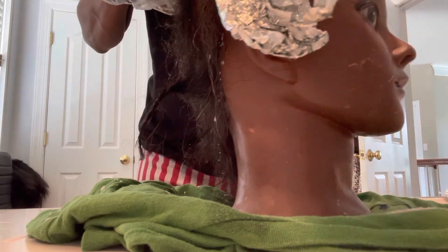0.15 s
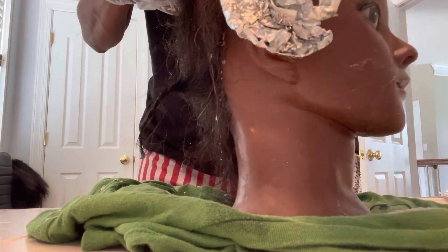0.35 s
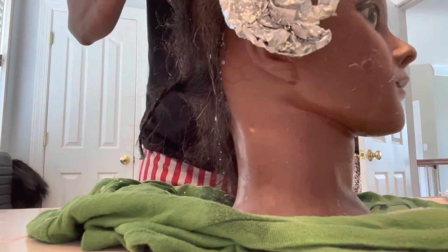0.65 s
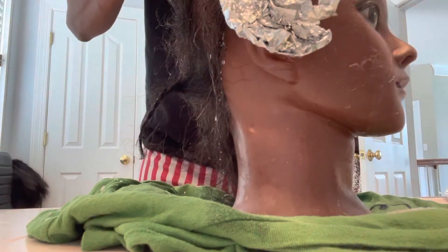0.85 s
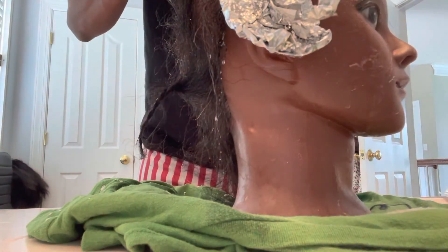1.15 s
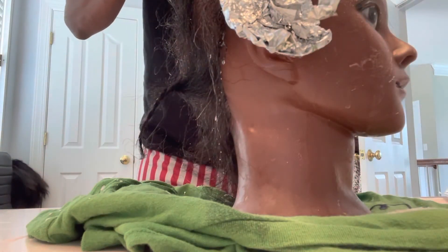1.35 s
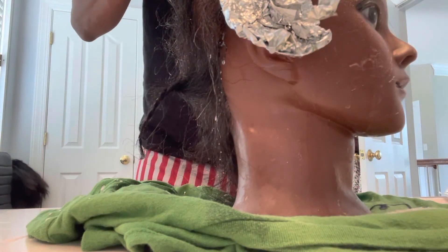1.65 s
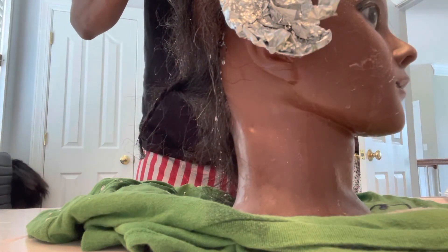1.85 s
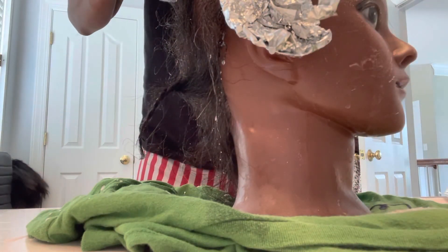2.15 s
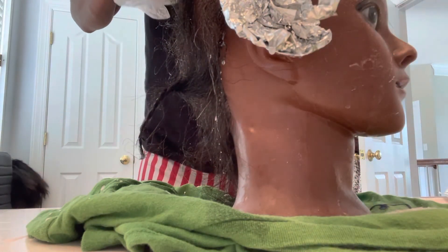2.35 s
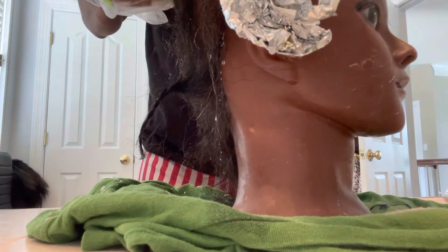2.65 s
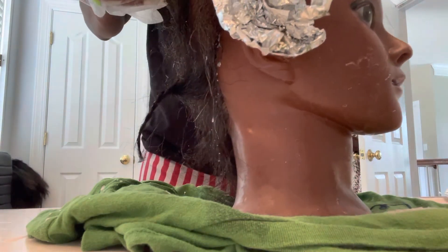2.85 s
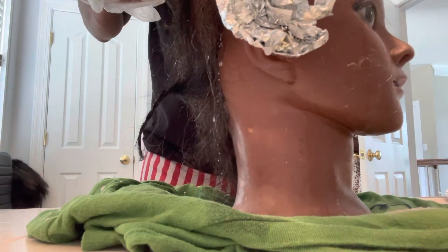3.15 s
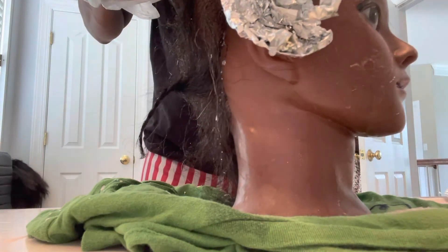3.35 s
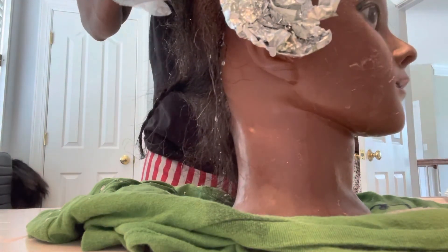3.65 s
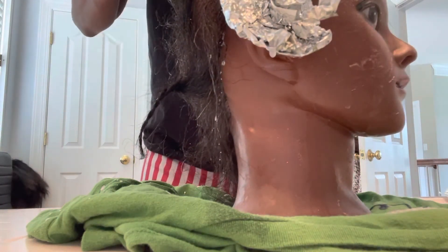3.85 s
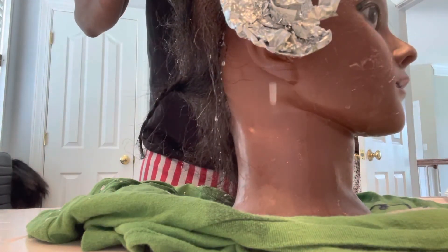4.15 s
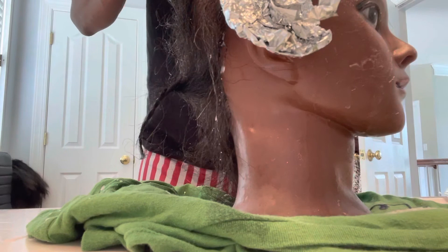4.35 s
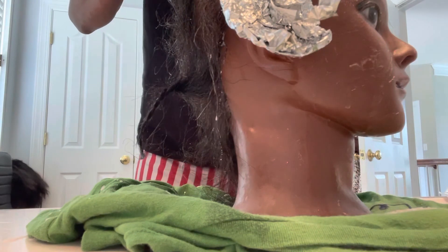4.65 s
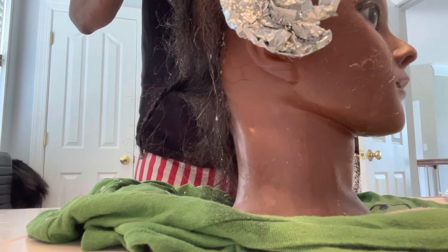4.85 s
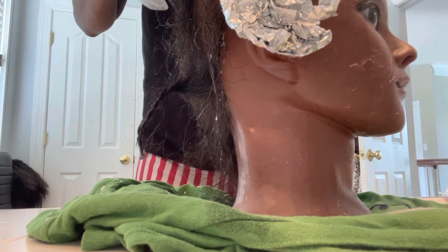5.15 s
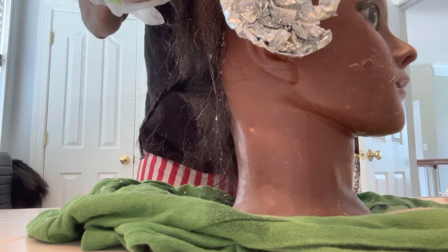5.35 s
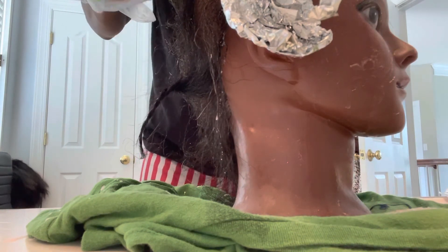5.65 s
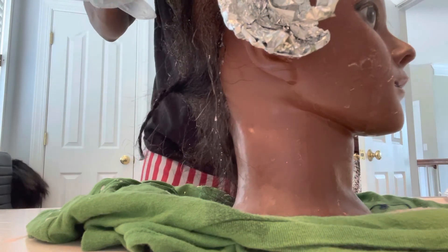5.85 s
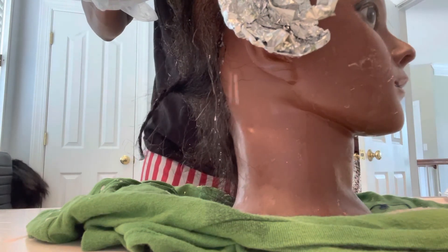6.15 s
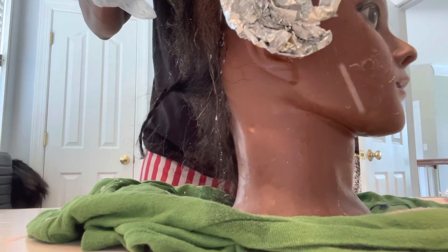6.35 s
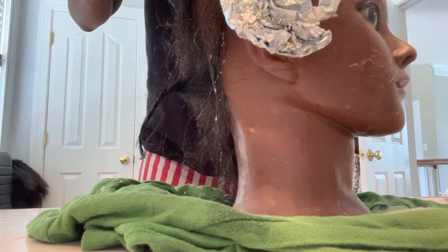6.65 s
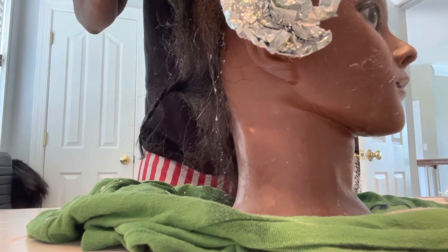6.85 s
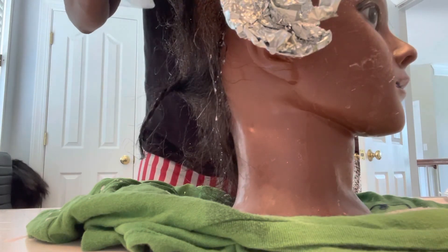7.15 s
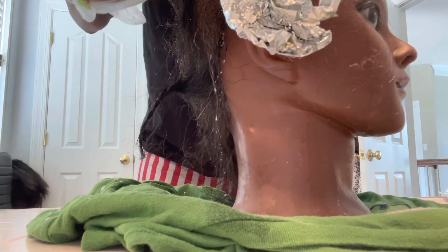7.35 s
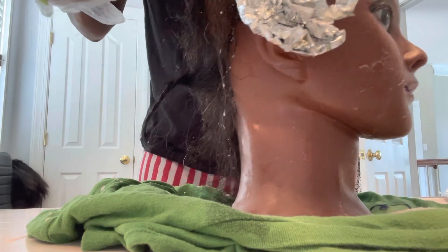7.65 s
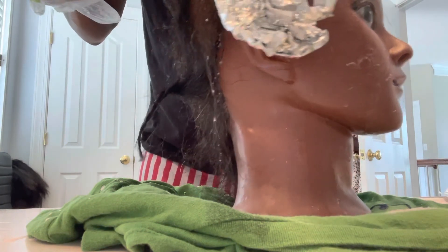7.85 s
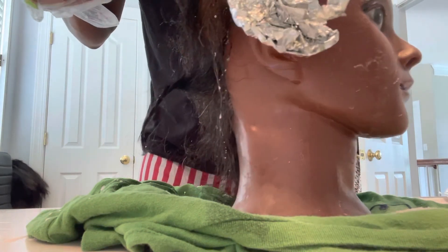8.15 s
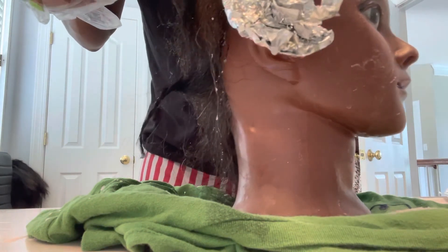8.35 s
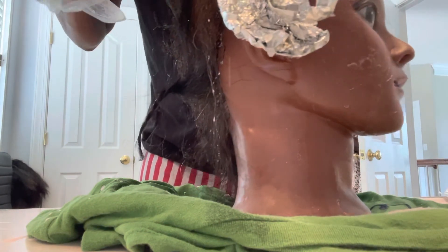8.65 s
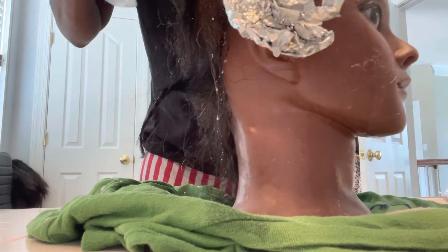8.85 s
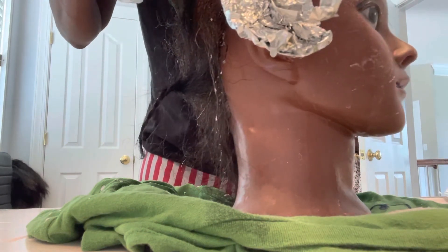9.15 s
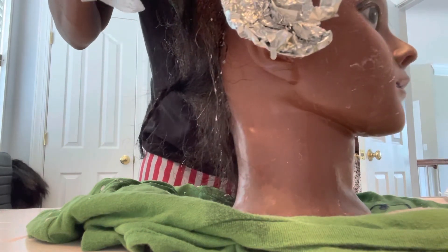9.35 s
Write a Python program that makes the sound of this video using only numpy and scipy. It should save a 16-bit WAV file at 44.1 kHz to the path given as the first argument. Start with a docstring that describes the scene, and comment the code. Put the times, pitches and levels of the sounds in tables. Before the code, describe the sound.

A low, steady ventilation hum fills a small room. Close by, a hand softly swishes down synthetic hair on a mannequin head, then a brush knocks and rasps through it, catching on tangles and snapping free. More soft swishes separate three further strokes, the last two short, each starting with a bite or hollow knock. Fine dry ticks and crackles scatter throughout, picked up by a close stereo microphone with a short room echo.

```python
"""A low ventilation hum lies under soft swishes as a hand smooths synthetic hair on a mannequin head.
Four brush strokes follow, with more swishes between them, close by in a small room.
The brush knocks on the head; its bristles catch, slip and snap free, ringing the brush pad.
Noise and random clicks make the rubbing; dying sine tones make the struck bodies ring."""
import sys
import numpy as np
from scipy import signal
from scipy.fft import rfft, irfft
from scipy.io import wavfile

SR = 44100
rng = np.random.default_rng(int(sys.argv[2]) if len(sys.argv) > 2 else 0)


def generate_wav(signal):
    """Clip the signal to [-1, 1] and save it as 16-bit WAV at the path in sys.argv[1]."""
    frames = np.transpose(np.atleast_2d(signal))
    scaled = np.clip(frames, -1, 1) * 32767
    pcm = np.round(scaled).astype(np.int16)
    wavfile.write(sys.argv[1], SR, pcm)


N = 419391  # length in samples


def gain_of(db):
    """Turns decibels into an amplitude factor."""
    return 10 ** (np.asarray(db) / 20)


def evened(x):
    """Scales a sound to an rms (average strength) of 1."""
    return x / np.sqrt(np.mean(x ** 2) + 1e-20)


def peaked(x):
    """Scales a sound to a peak of 1."""
    return x / abs(x).max()


def read(points, hz):
    """Reads between the points of a (frequency, value) table, on a log-frequency axis."""
    f, value = np.transpose(points)
    return np.interp(np.log(hz + 1), np.log(f + 1), value)


def add(mix, s, sound):
    """Mixes a sound in at time s, in seconds."""
    part = mix[max(round(s * SR), 0):][:len(sound)]
    part += sound[:len(part)]


def colour(x, points, size=2048):
    """Filters to a given spectrum without sounding ahead, so clicks keep their sharp front."""
    hz = abs(np.fft.fftfreq(size, 1 / SR))
    log_gain = np.log(gain_of(read(points, hz)))
    # the Hilbert transform supplies the phase that packs the energy at the front
    response = np.exp(np.conj(signal.hilbert(log_gain)))
    taps = np.fft.ifft(response).real
    return signal.oaconvolve(x, taps[:size // 2])[:len(x)]


def radiated(x, edge_hz):
    """A small surface sheds its lowest tones: a high-pass filter."""
    high_pass = signal.butter(3, edge_hz, "high", fs=SR, output="sos")
    return signal.sosfilt(high_pass, x)


def ring(modes, size=6000):
    """A struck body rings in several dying tones at once; the sum has a peak of 1."""
    t = np.arange(size) / SR
    tones = (gain_of(db - 60 * t / t60) * np.sin(2 * np.pi * hz * t) for hz, db, t60 in modes)
    return peaked(sum(tones))


def brush_ring(stretch):
    """The pad, its pitch stretched by the load, rings together with the stiff back of the brush."""
    # tones of the pad: pitch_hz (before the stretch), level_db (relative), time_to_fall_60_db_s
    pad_modes = [(936, 7, 0.023), (1059, -2.5, 0.024), (1237, -9.5, 0.04)]
    # tones of the stiff back: pitch_hz, level_db (relative), time_to_fall_60_db_s
    back_modes = [(1564, -3.5, 0.019), (2417, -5.5, 0.021), (2462, -19.5, 0.19), (3040, -16.5, 0.024),
                  (4380, -39, 0.011)]
    return ring([(hz * stretch, db, t60) for hz, db, t60 in pad_modes] + back_modes)


def crack(t60, rise_s, size=6000):
    """Slipping fibres make a short noise burst that falls 60 dB in t60 seconds."""
    t = np.arange(size) / SR
    fade = gain_of(-60 * t / t60)
    return rng.standard_normal(size) / 2 * fade * (1 - np.exp(-t / rise_s))


def slips(per_s, spread_db, smooth):
    """Fibres catch and slip: random clicks of uneven size over smooth sliding noise."""
    size = gain_of(spread_db * np.minimum(rng.exponential(1, N), 4))
    happens = rng.random(N) < per_s / SR
    clicks = size * rng.choice([-1, 1], N) * happens
    return evened(evened(clicks) + smooth * rng.standard_normal(N))


def clumps(depth_db, rate_hz):
    """The gain wanders unevenly as tufts of hair pass."""
    slow_only = 1 / (1 + (np.fft.rfftfreq(N, 1 / SR) / rate_hz) ** 4)
    wander = irfft(rfft(rng.standard_normal(N)) * slow_only, N)
    return gain_of(depth_db * evened(wander))


def shifting(rate_hz, count):
    """Weights that pass a sound at random between several places; their squares sum to 1."""
    weights = np.array([clumps(27.0, rate_hz) for _ in range(count)])
    return weights / np.linalg.norm(weights, axis=0)


def patches(x, depth_db, width_hz, span_s, size=256):
    """Each passing tuft rasps in its own band for a moment: gain drifts over time and frequency."""
    overlap = 3 * size // 4
    z = signal.stft(x, nperseg=size, noverlap=overlap)[2]
    cycles_per_hz = np.fft.fftfreq(len(z), SR / size)[:, None]
    rate_hz = np.fft.fftfreq(z.shape[1], size / 4 / SR)
    blur = np.exp(-(cycles_per_hz * width_hz) ** 2 - (rate_hz * span_s) ** 2)
    # random values, blurred into patches
    field = evened(np.fft.ifft2(np.fft.fft2(rng.standard_normal(z.shape)) * blur).real)
    patched = z * evened(gain_of(depth_db * field))
    return signal.istft(patched, nperseg=size, noverlap=overlap)[1][:N]


def envelope(s, rise_s, hold_s, fade_s):
    """Gain that swells up to time s, holds, and dies away."""
    t = np.arange(N) / SR - s
    before = (np.minimum(t, 0) / rise_s) ** 2 / 2
    after = np.maximum(t - hold_s, 0) / fade_s
    return np.exp(-np.minimum(before + after, 20))


def effort():
    """The brush drags and glides: each pull, bite, tangle and release adds its power to both."""
    # in all four tables drag_db drives the pad and glide_db the fizz of the fibres
    # pulls of the brush through the hair: start_s, length_s, drag_db, glide_db
    pull_table = [(0.692, 1.29, -61, -60.5), (3.786, 1.05, -53, -55.5), (6.542, 0.55, -61, -61.5),
                  (8.86, 0.37, -58, -58)]
    # bristles bite into fresh hair: time_s, drag_db, glide_db
    bite_table = [(0.708, -47.5, -51), (0.748, -54, -52), (0.857, -51.5, -52), (1.196, -44.5, -51),
                  (3.946, -41, -42), (4.318, -43, -47.5), (6.546, -50, -49), (8.865, -50, -51.5)]
    # tangles tighten, then give: tightest_s, drag_db, glide_db, giving_time_s
    tangle_table = [(0.935, -40.5, -41, 0.036), (1.03, -44.5, -48, 0.21), (1.53, -50.5, -55, 0.2),
                    (1.67, -45, -50, 0.058), (1.884, -46, -49, 0.074), (4.075, -49, -50, 0.15),
                    (4.227, -43.5, -45, 0.13), (4.465, -60, -50, 0.074), (4.695, -48.5, -48, 0.11),
                    (4.794, -46, -49, 0.12), (4.975, -44, -48.5, 0.11), (6.756, -44.5, -45.5, 0.082),
                    (6.845, -41.5, -49, 0.014), (6.985, -49.5, -53.5, 0.062), (9.059, -39.5, -44.5, 0.056),
                    (9.143, -47, -48.5, 0.035), (9.243, -50, -53, 0.045)]
    # the brush tears free of the hair ends: time_s, drag_db, glide_db, scrape_length_s
    release_table = [(2.057, -37, -43, 0.07), (5.042, -32.5, -39, 0.046)]
    parts = [(envelope(s, 0.0022, length, 0.0044), dbs) for s, length, *dbs in pull_table]
    parts += [(envelope(s, 0.0076, 0, 0.061), dbs) for s, *dbs in bite_table]
    # a tangle tightens faster than it gives
    parts += [(envelope(s, 0.43 * give, 0, give), dbs) for s, *dbs, give in tangle_table]
    parts += [(envelope(s, 0.0022, length, 0.026), dbs) for s, *dbs, length in release_table]
    return np.sqrt(sum(np.outer(gain_of(dbs), shape) ** 2 for shape, dbs in parts))


def diffuse(pair):
    """Makes two unrelated signals as alike as diffuse sound is at the two microphone ports."""
    # likeness of the two ports, limited below to 0..1: frequency_hz, likeness
    likeness = [(100, 1), (200, 0.37), (300, 1.03), (450, -0.19)]
    size = pair.shape[1]
    a, b = rfft(pair)
    same = np.clip(read(likeness, np.fft.rfftfreq(size, 1 / SR)), 0, 1)
    mid = a * np.sqrt((1 + same) / 2)
    side = b * np.sqrt((1 - same) / 2)
    return irfft(np.array([mid + side, mid - side]), size)


def ventilation():
    """Shaped noise makes a low rush of air, and narrow resonances make a wavering hum."""
    # spectrum of the air: frequency_hz, level_db (relative)
    air_spectrum = [(12, -59), (20, -29), (34, -29), (96, -2), (127, -11), (328, -24.5), (434, -25.5),
                    (485, -29), (527, -28.5), (873, -39.5), (2600, -59), (7520, -60.5), (9950, -72),
                    (11100, -58), (16000, -71)]
    # resonances of the hum: pitch_hz, half_width_hz, rms_level_db
    hum_table = [(97.4, 6.6, -51.5), (53.4, 7.6, -57), (125, 9.9, -57), (847, 124, -70.5)]
    hz = np.fft.rfftfreq(N, 1 / SR)

    def noise(shape):
        """Random noise in two channels takes on a spectrum."""
        return evened(irfft(rfft(rng.standard_normal((2, N))) * shape, N))

    air = gain_of(-47.5) * noise(gain_of(read(air_spectrum, hz)))
    hum = sum(gain_of(db) * noise(1 / (1 + ((hz - f) / width) ** 2)) for f, width, db in hum_table)
    return diffuse(air + hum)


def rocking():
    """Let go by the brush, the head rocks back and the table booms briefly: a swelling sine tone."""
    # the rock after the first release: time_s, peak_level_db, pitch_hz
    rock = (2.135, -34.5, 100)
    s, db, hz = rock
    swell = envelope(s, 0.025, 0, 0.06)
    return gain_of(db) * swell * np.sin(2 * np.pi * hz * np.arange(N) / SR)


def smoothing():
    """A cupped hand slides down the hair: fine hiss and a hollow tone under the palm."""
    # swishes of the hand: middle_s (before the leads below), hiss_db, palm_db, half_length_s
    swish_table = [(0.069, -51, -57.5, 0.036), (0.327, -53.5, -64, 0.024), (0.44, -59.5, -93, 0.014),
                   (2.516, -60, -56.5, 0.033), (2.75, -67.5, -61.5, 0.027), (2.87, -58, -52, 0.037),
                   (3.239, -61, -53, 0.029), (3.575, -66.5, -81, 0.013), (3.668, -73, -73, 0.085),
                   (5.528, -61, -56, 0.038), (5.891, -63, -59, 0.044), (6.157, -59.5, -56, 0.03),
                   (7.174, -71.5, -70, 0.049), (7.543, -70.5, -64, 0.024), (7.656, -72.5, -56.5, 0.046),
                   (7.959, -81, -54.5, 0.0077), (8.049, -63.5, -56, 0.03), (8.425, -64.5, -50.5, 0.019),
                   (8.477, -64.5, -54.5, 0.019)]
    # spectrum of the sliding hand: frequency_hz, level_db (relative)
    swish_spectrum = [(200, -18), (1000, -6), (2000, -9), (3000, -7), (3800, 2.5), (5000, 3), (6200, -1.5),
                      (7500, 2), (9200, -0.5), (11000, 8), (13000, 4.5), (16000, 3)]
    # tones of the hollow under the palm: pitch_hz, level_db (relative), time_to_fall_60_db_s
    palm_modes = [(659, -4, 0.036), (790, -19, 0.016), (870, -10, 0.014)]
    t = np.arange(N) / SR
    middle, hiss_db, palm_db, half = np.transpose(swish_table)[:, :, None]

    def swell(lead_s):
        """Each swish swells and fades, peaking lead_s before its middle time."""
        return np.exp(-((t + lead_s - middle) / half) ** 2 / 2)

    rub = slips(per_s=2400, spread_db=1.5, smooth=0.74) * clumps(depth_db=3.0, rate_hz=53)
    hiss_level = (gain_of(hiss_db) * swell(lead_s=0.0061)).sum(0)
    hiss = gain_of(3.0) * evened(colour(rub, swish_spectrum)) * hiss_level
    palm_slips = slips(per_s=350, spread_db=0.0, smooth=0.17)
    hollow = signal.oaconvolve(palm_slips, ring(palm_modes))[:N]
    hollow = evened(radiated(hollow, edge_hz=510))
    return hiss + hollow * (gain_of(palm_db) * swell(lead_s=0.015)).sum(0)


def crackle(glide):
    """Loose strands give tiny dry ticks at random under the moving brush."""
    ticks = slips(per_s=70, spread_db=5.5, smooth=0)
    ticks = signal.oaconvolve(ticks, crack(t60=0.0055, rise_s=0.00047))[:N]
    spectrum = [(500, -7.5), (2500, 5.5), (5000, 1.0), (8500, -2.5), (10800, -3), (13000, 4.0), (16000, -10.0)]
    return gain_of(-12.5) * evened(colour(ticks, spectrum)) * glide


def flicks():
    """Single bristles and strands spring back with a noise tick: the brighter, the shorter."""
    # time_s, peak_db (before the room), brightest_hz
    flick_table = [(0.399, -46, 11000), (0.743, -35, 12000), (0.858, -33, 3660), (0.897, -32, 11000),
                   (1.568, -36, 11800), (1.976, -34, 12200), (2.289, -34.5, 13100), (2.464, -50, 4050),
                   (2.852, -35, 11000), (3.81, -39.5, 11500), (3.94, -30.5, 3770), (3.972, -37, 11500),
                   (4.702, -33, 11000), (4.753, -36, 4700), (6.306, -47.5, 12500), (6.393, -35, 12300),
                   (6.604, -33, 3160), (6.632, -38, 6000), (6.728, -27, 11200), (6.929, -42, 11300),
                   (7.053, -41, 12000), (7.091, -39.5, 12000), (7.809, -45.5, 12400), (9.076, -34, 11000),
                   (9.288, -46.5, 10900), (9.383, -47, 6530)]
    out = np.zeros(N)
    for s, db, hz in flick_table:
        tick = crack(t60=92 / hz, rise_s=0.00086)  # falls 60 dB in 92 cycles
        tick = colour(tick, [(300, -34), (hz * 0.53, -15), (hz, 0), (hz * 2, -10)])
        add(out, s - .001, gain_of(db) * peaked(tick))
    return out


def snags():
    """A taut strand slips along a bristle: a few rising cycles inside a short rough scrape."""
    # time_s, level_db, pitch_hz (the chirp starts a little lower), scrape_db (relative to level_db),
    # scrape_time_to_fall_60_db_s
    snag_table = [(1.1702, -31, 1120, -7, 0.061), (1.179, -37, 1330, -4, 0.067),
                  (1.214, -38.5, 3100, -8, 0.06), (1.921, -49.5, 2550, 9, 0.058),
                  (2.111, -42, 2450, 8.5, 0.18), (2.852, -38, 1570, -3.5, 0.064),
                  (4.267, -50, 2380, 7, .04), (4.947, -32.5, 1430, -2, .02),
                  (5.008, -29, 2080, -0.5, 0.006), (6.127, -46, 653, -3, 0.056),
                  (6.138, -40, 630, -2, 0.066), (7.968, -66, 2400, 2.5, .05),
                  (9.052, -46.5, 2220, 7.5, 0.16)]
    out = np.zeros(N)
    t = np.arange(14000) / SR
    for s, db, hz, scrape_db, t60 in snag_table:
        age = t / 0.0011
        pulse = age * np.exp(1 - age)
        chirp = pulse * np.sin(2 * np.pi * hz * t * (0.933 + 11 * t))
        scrape = crack(t60=t60, rise_s=0.0027, size=len(t))
        band = [(hz * 0.52, -32), (hz * 0.47, -10), (hz * 1.1, 0), (hz * 1.22, -20), (hz * 4, -36)]
        scrape = peaked(colour(scrape, band))
        add(out, s - .001, gain_of(db) * (chirp + gain_of(scrape_db) * scrape))
    return out


def knocks():
    """The bristles crack first; then a push, longer and duller the harder it is, rings pad and head."""
    # knocks of the brush: time_s, peak_db (before the room), pad_pitch_hz,
    # head_thud_db and bristle_crack_db (both relative to peak_db)
    knock_table = [(0.702, -35.5, 900, -0.5, 6), (0.928, -33, 1130, -25, -9), (0.938, -29, 1120, -33, -22),
                   (1.1953, -30, 956, -28, -1.5), (1.672, -37.5, 960, -28, -14),
                   (2.0546, -24, 903, -13, -10.5), (2.066, -28.5, 990, -28, -12),
                   (2.085, -27.5, 890, -20, -6), (2.108, -24.5, 920, -26, -13), (2.119, -30, 945, -14, -2),
                   (4.055, -32, 976, -26, -26), (4.187, -33, 910, -9, -8), (4.206, -32.5, 957, -14, -16),
                   (4.229, -31, 920, -31, -5), (4.316, -24, 897, -6, -8), (5.04, -20.5, 1004, -10.5, -8.5),
                   (5.051, -25.5, 1175, -21, -25), (5.089, -28.5, 1160, -10, -5),
                   (6.5484, -15.5, 878, -4.5, -9.5), (6.746, -31, 1040, -34, -8),
                   (6.796, -35.5, 960, -31, -20), (6.847, -38.5, 890, -8, -1.5), (8.873, -26, 838, -2, -1)]
    # tones of the hollow head: pitch_hz, level_db (relative), time_to_fall_60_db_s
    head_modes = [(162, -22, 0.024), (268, -4.5, 0.038), (377, 8.5, 0.028)]
    crack_spectrum = [(500, -40), (2500, -7.5), (4300, 6.5), (7000, -8.5), (11000, -1.5), (16000, -26.5)]
    out = np.zeros(N)
    t = np.arange(-40, 41) / SR
    for s, db, hz, thud_db, crack_db in knock_table:
        # a harder knock sinks deeper and stays longer: contact doubles with every 5.5 dB
        contact_s = .00014 * 2 ** ((db + 18.5) / 5.5)
        push = np.exp(-(t / contact_s) ** 2 / 2)
        pad = np.convolve(brush_ring(hz / 930), push)  # unstretched, the pad sounds near 930 Hz
        pad = peaked(radiated(pad, edge_hz=0.92 * hz))
        bristles = peaked(colour(crack(t60=0.0079, rise_s=0.00036), crack_spectrum))
        start_s = s - .0006
        add(out, start_s, gain_of(db + crack_db) * bristles)
        add(out, start_s, gain_of(db) * pad)
        # after two swings the pad strikes once more, 6 dB weaker
        add(out, start_s + 2 / hz, gain_of(db - 6) * pad)
        add(out, s, gain_of(db + thud_db) * ring(head_modes))
    return out


def brushing(drag, glide):
    """Bristles rake the hair: each slip rings the pad, whose pitch shifts as the load moves over it."""
    # spectrum of the raking bristles: frequency_hz, level_db (relative)
    rake_spectrum = [(100, 0), (250, -6), (420, 3.5), (640, -4), (1000, -1.5), (1400, -0.5), (2000, 1.5),
                     (2450, -4), (2800, -3.5), (4200, -7), (6500, -15), (16000, -50)]
    # spectrum of the fizzing fibres: frequency_hz, level_db (relative)
    fizz_spectrum = [(300, -13), (1500, 2), (2600, -7), (3400, 6.5), (4600, -1), (6000, -6), (7500, 4.5),
                     (9200, -7), (11000, 3.5), (12800, 2.5), (14500, -12), (16000, 1)]
    plucks = slips(per_s=750, spread_db=4.0, smooth=0.56) * clumps(depth_db=4.0, rate_hz=110)
    stretches = 1 + 0.077 * np.array([-0.27, 0.96, -0.2, 1.2])
    loads = zip(shifting(23.0, count=4), stretches)
    pad = sum(signal.oaconvolve(plucks * w, brush_ring(k))[:N] for w, k in loads)
    pad = evened(radiated(pad, edge_hz=760))  # the small pad radiates little below this
    # tufts of different tension rasp at different pitches
    tufts = [colour(slips(per_s=700, spread_db=3.0, smooth=1.0), np.multiply(rake_spectrum, [k, 1]))
             for k in (.92, 1, 1.1)]
    rake = (tufts * shifting(15.4, count=3)).sum(0)
    rake = evened(rake * clumps(depth_db=2.5, rate_hz=25))
    fine_slips = slips(per_s=900, spread_db=2.0, smooth=1.0)
    fizz = evened(colour(0.79 * plucks + fine_slips, fizz_spectrum))
    # hair held taut by heavy drag fizzes less
    slack = ((glide + 1e-9) / (drag + 1e-9)) ** 1.3
    pad_part = gain_of(-5.0) * pad * drag
    rake_part = gain_of(0.5) * rake * drag ** 0.3 * glide ** 0.8
    fizz_part = gain_of(-1.5) * fizz * glide * slack
    return pad_part + rake_part + fizz_part


def room(x, wet_db, early_db, size=30000, count=8):
    """Direct sound, a few reflections off table and door, and a fading noise tail fill the room."""
    # how long the tail lasts: frequency_hz, time_to_fall_60_db_s
    room_fade = [(150, 0.51), (900, 0.47), (1900, 0.52), (2450, 0.46), (3100, 0.37), (6000, 0.58),
                 (14000, 0.3)]
    # balance between the ports: frequency_hz, left_minus_right_db
    lean = [(150, 3), (400, -7), (680, -6.5), (950, -8), (1500, -2), (2600, 0), (3400, 0.5), (4600, -6.5),
            (6000, -0.5), (16000, 0.5)]
    hz, t, z = signal.stft(rng.standard_normal((2, size)), SR, nperseg=256)
    fade_db = -60 * t / np.maximum(read(room_fade, hz), .05)[:, None]
    tail_db = read([(200, -2.5), (900, -0.5), (3000, 5.5), (12000, -3.5)], hz)[:, None]
    tail = signal.istft(z * gain_of(fade_db + tail_db), SR)[1][:, :size]
    tail = tail * np.minimum(np.arange(size) / SR / 0.00036, 1)
    early = np.zeros((2, size))
    for side in early:
        places = (rng.uniform(.002, .016, count) * SR).astype(int)
        side[places] = rng.choice([-1, 1], count) / np.sqrt(count)
    echo = diffuse(gain_of(wet_db) * tail / np.linalg.norm(tail[0]) + gain_of(early_db) * early)
    echo[:, 0] += 1  # the direct sound
    heard = signal.fftconvolve(x[None], echo, axes=1)[:, :N]
    # most frequencies lean to the right
    lean_db = read(lean, np.fft.rfftfreq(N, 1 / SR))
    return irfft(rfft(heard) * gain_of([lean_db / 2, -lean_db / 2]), N)


def scene():
    """Moving hands excite the room from changing places; knocks and snags ring over the ventilation."""
    drag, glide = effort()
    rub = brushing(drag, glide) + smoothing()
    rub = patches(rub, depth_db=1.9, width_hz=400, span_s=0.026)
    places = shifting(2.26, count=3)
    rubbing = gain_of(-2.5) * sum(room(rub * w, wet_db=-11, early_db=-1) for w in places)
    blows = room(knocks() + flicks() + snags() + crackle(glide), wet_db=-8.5, early_db=-14)
    return rubbing + blows + rocking() + ventilation()


def record(dry):
    """The two ports dip the treble and turn its phase between the channels; then the top is cut off."""
    # phase between the channels: frequency_hz, left_lead_radians
    phase_turn = [(300, 0), (950, -1.26), (1300, 0.45), (2450, 6), (3500, 4.5), (5000, 4.5), (7000, 7),
                  (8000, 9.5), (11000, 10.5), (12000, 13), (15300, 16)]
    # colour of the ports: frequency_hz, level_db
    port_dips = [(8000, 0), (9100, -7), (10200, 0), (13000, -7.5), (14300, -5), (15600, -4)]
    hz = np.fft.rfftfreq(N, 1 / SR)
    turn = read(phase_turn, hz)
    turns = np.exp(1j * np.array([turn / 2, -turn / 2]))
    ports = irfft(rfft(dry) * gain_of(read(port_dips, hz)) * turns, N)
    low_pass = signal.firwin(511, 15750, window=("kaiser", 9), fs=SR)  # edge in Hz
    return signal.oaconvolve(ports, low_pass[None], "same")


dry = scene()
out = record(dry)
generate_wav(out)
```